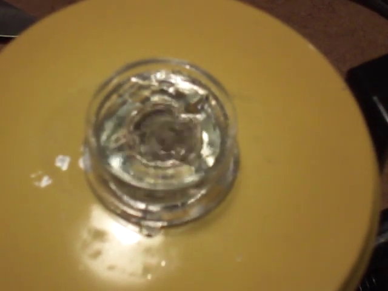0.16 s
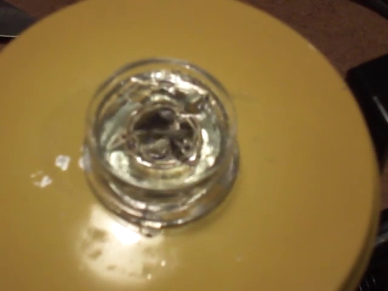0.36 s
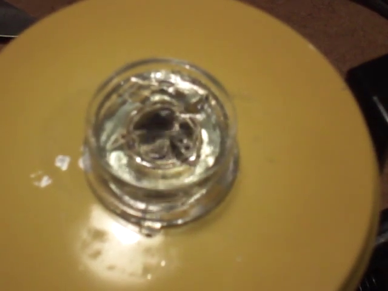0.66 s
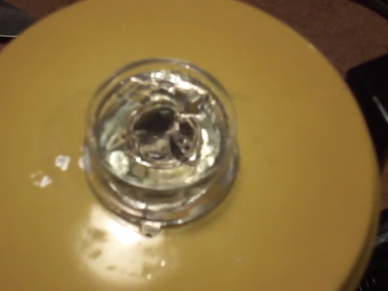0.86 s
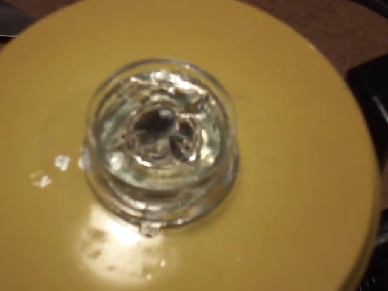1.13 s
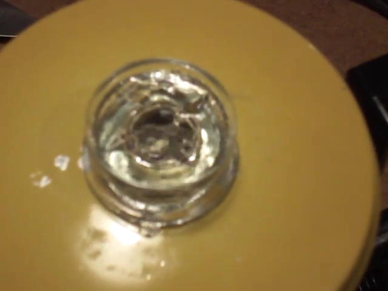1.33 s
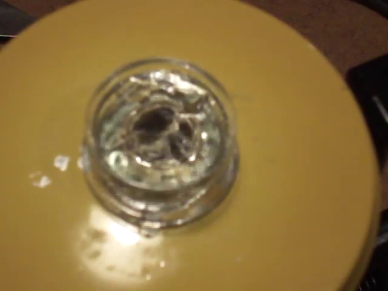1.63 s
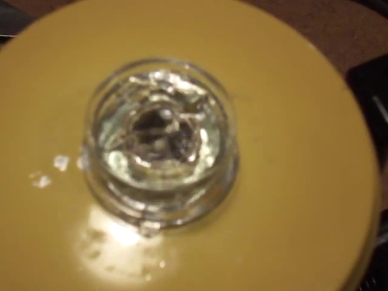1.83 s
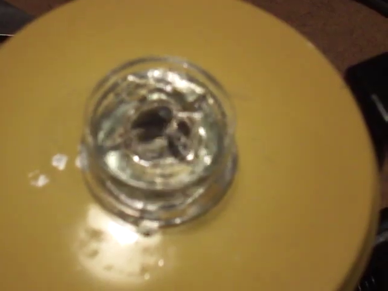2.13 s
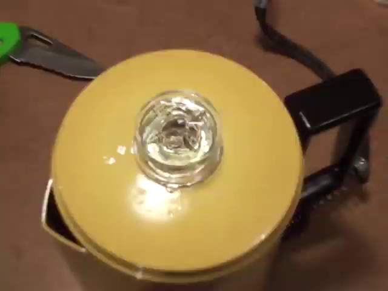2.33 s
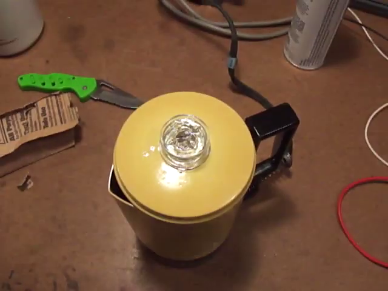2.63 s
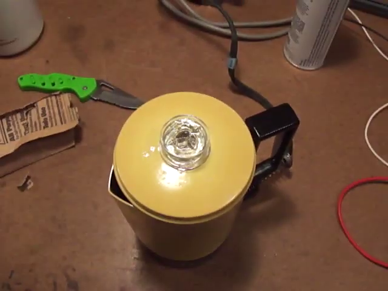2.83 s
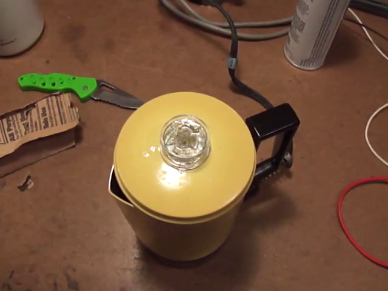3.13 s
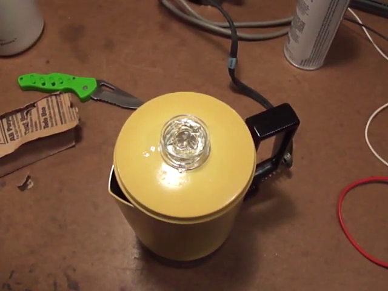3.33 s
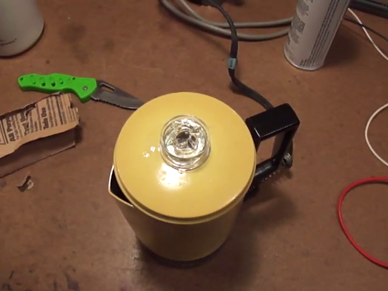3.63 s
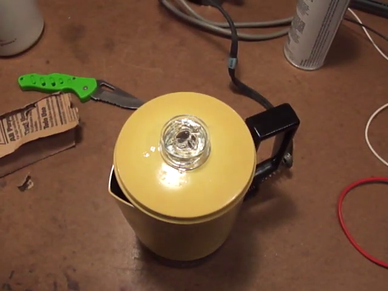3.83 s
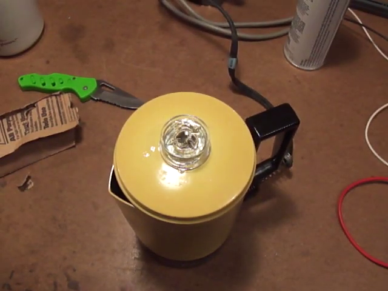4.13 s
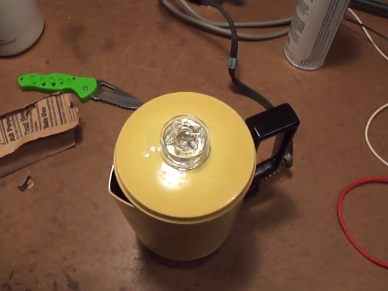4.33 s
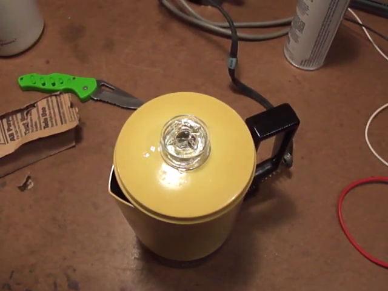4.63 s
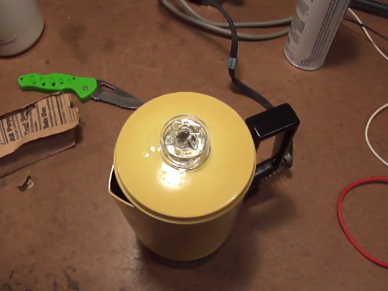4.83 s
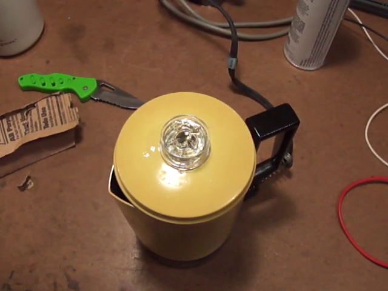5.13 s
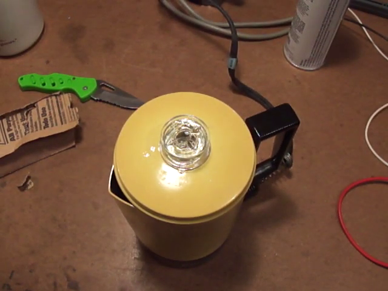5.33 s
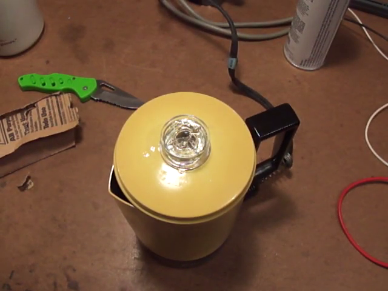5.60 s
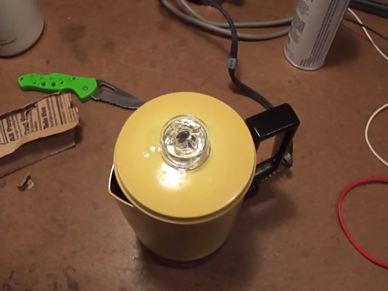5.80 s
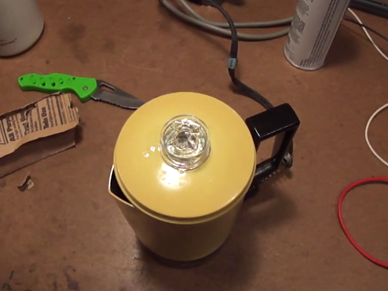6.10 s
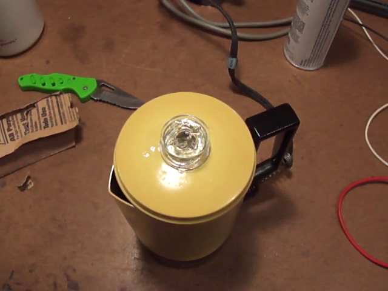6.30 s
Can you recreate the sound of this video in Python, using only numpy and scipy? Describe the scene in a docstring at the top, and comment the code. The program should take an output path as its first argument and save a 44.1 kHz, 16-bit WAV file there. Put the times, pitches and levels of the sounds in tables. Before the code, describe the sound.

Close by, a metal coffee percolator simmers with a steady, fine crackling hiss. About once a second, water spurts up against the knob in clusters of hollow, wet pops, then gurgles and sizzles back. Around two seconds in, the camera clicks, its zoom motor rasps and whines briefly, and its focus hisses. Later spurts are denser. Small, fairly dry indoor room, mono.

```python
"""An electric percolator brews beside a camera, over a steady crackling simmer of collapsing steam bubbles.
About once a second water spurts up the stem: damped bubble tones pop through the resonances of the pot,
with sharp noise splashes; filtered grains then gurgle and sizzle as the water falls back.
From about 2 s the camera joins in: its focus drive hisses, noise bursts click, the zoom drive rasps and
whines for a fifth of a second, and the focus drive hisses again; a few more clicks follow."""
import sys
import numpy as np
from scipy import signal
from scipy.fft import rfft, irfft
from scipy.io import wavfile

SR = 44100
rng = np.random.default_rng(int(sys.argv[2]) if len(sys.argv) > 2 else 0)


def transcribe(u):
    """Save the signal u as a 16-bit wav file named by the first command-line argument.

    u: samples, shape (n,) or (channels, n), limited to [-1, 1]; the rate is SR.
    q: integer samples, one column per channel.
    """
    v = np.clip(np.atleast_2d(u).T, -1, 1)
    q = np.round(v * 32767).astype(np.int16)
    wavfile.write(sys.argv[1], SR, q)


N = 284886
TIME = np.arange(N) / SR
FREQS = np.fft.rfftfreq(N, 1 / SR)

# slugs of water rising up the stem: (time [s], sag of the simmer [dB], negative for a swell,
# fall-back time [s], gurgle level [dB], sizzle level [dB])
SLUGS = [(.235, 0.9, .2, -65, -51), (1.15, 0, 0.22, -78, -67), (1.86, -0.2, 0.13, -73, -62),
         (3.27, 1.5, .22, -60, -53.5), (4.27, 0.8, 0.24, -64, -52), (5.2, 1, 0.29, -69, -52),
         (6.1, 0.7, .18, -54.5, -74)]
# resonances of the air above the water: (frequency [Hz], width [Hz], gain [dB])
AIR_MODES = [(907, 86, -6.5), (1012, 23, 4.5)]
# resonances of the metal wall: (frequency [Hz], width [Hz], lift before scaling [dB])
WALL_MODES = [(2812, 125, 7), (4080, 380, 3), (5500, 455, 9.5), (6380, 420, 8.5), (8710, 320, 11),
              (9300, 510, 4.5), (11790, 190, 6.5), (14200, 230, 4), (15700, 190, 7)]


def spurts(cycles=1.573, froth_s=0.008, froth_db=-14, frothiness=0.23, froth_fade_db_per_s=250,
           splash_decay_s=0.0008, splash_db=-3, count=6):
    """Bubble resonance: each main pop is a damped tone in a froth of lesser bubbles, with a sharp splash."""
    # pops of water against the knob, lid and pot:
    # (time [s], relative level [dB], pitch [Hz], relative level of the splash [dB])
    main_pops = [(.084, -39.5, 1960, -39.5), (0.142, -36.5, 1600, -52), (.2329, -20.5, 1635, -38),
                 (0.245, -32, 1850, -50), (0.3157, -30, 1520, -52), (0.3971, -39, 1750, -55),
                 (.4030, -32, 1780, -50), (1.099, -32.5, 1640, -55), (1.148, -33, 1640, -50),
                 (1.2048, -38.5, 1820, -34.5), (1.811, -52.5, 1090, -39), (1.847, -30, 1680, -43),
                 (1.94, -39.5, 1700, -49), (1.9974, -36, 1770, -47), (2.0065, -34.5, 1640, -31),
                 (2.013, -43, 1490, -36), (2.532, -27.5, 1880, -55), (2.5407, -31.5, 1720, -22.5),
                 (2.6304, -34, 1910, -54), (2.649, -31.5, 1770, -29.5), (3.208, -31.5, 1640, -42),
                 (3.214, -27.5, 1800, -48), (3.2343, -25, 1800, -27), (3.2602, -26, 1720, -50),
                 (3.2626, -23.5, 1740, -30.5), (3.2791, -23, 1910, -39), (3.2926, -28, 1500, -25.5),
                 (3.298, -29, 1550, -29), (3.332, -49, 1040, -56), (4.2428, -31.5, 1850, -46),
                 (4.251, -25, 1750, -36.5), (4.273, -22, 1910, -34), (4.3083, -26.5, 1620, -45),
                 (4.3904, -36.5, 1760, -57), (4.3984, -34, 1800, -44), (5.161, -16.5, 1840, -26),
                 (5.183, -28.5, 1470, -52), (5.193, -25, 1800, -38), (5.2269, -22, 1720, -25.5),
                 (5.267, -31, 1840, -44), (5.28, -36, 1500, -48), (5.322, -30, 1780, -40),
                 (5.444, -34, 1750, -52), (6.0773, -28, 1690, -43), (6.0866, -24.5, 1900, -31),
                 (6.0955, -22, 1760, -45), (6.1055, -30, 1410, -55), (6.1285, -25, 1780, -36),
                 (6.152, -40, 1810, -41), (6.265, -45, 1610, -50), (6.281, -57, 920, -58)]
    # colour that the pot gives to the pops: (frequency [Hz], gain [dB])
    pot_colour = [(100, -10), (400, -5.5), (620, 3), (850, 13.5), (1120, 1), (1450, 0.5), (1850, 2.5),
                  (2300, 6), (3050, 13), (3900, 29.5), (5000, 6), (15000, -32)]
    # brief ringing of the glass knob under the splash: (frequency [Hz], gain [dB])
    knob_colour = [(300, -27), (3300, 9), (6500, 2.5), (8300, 10), (9300, 13.5), (10400, 4.5), (16000, -7)]
    lead = 0.003  # silence [s] ahead of each pop
    t = np.arange(SR // 20) / SR
    pops, splashes = np.zeros(N), np.zeros(N)
    hardest_db = max(row[1] for row in main_pops)
    for s, db, hz, sharp_db in [*main_pops, *stray_pops()]:
        swell = cycles / hz  # low bubbles swell and fade more slowly
        pop = bubble(t - lead, hz, swell)
        lesser = gain_of(froth_db + frothiness * (hardest_db - db))  # gentle pops carry relatively more froth
        delays = froth_s * rng.exponential(1, count)
        pitches = hz * np.exp(0.19 * rng.uniform(-0.8, 1, count))
        for delay, pitch in zip(delays, pitches):
            level = lesser * gain_of(-froth_fade_db_per_s * delay)
            pop = pop + level * bubble(t - lead - swell - delay, pitch, cycles / pitch)
        add(pops, s - lead, gain_of(db - 5.5) * pop)
        onset = np.minimum(2 * t / splash_decay_s, 1)
        splash = burst(t, splash_decay_s) * onset
        add(splashes, s + swell / 2, gain_of(sharp_db + splash_db) * splash)
    pops = colour(pops, read(pot_colour, FREQS))
    pops = pops + sum(gain_of(db) * resonate(pops, hz, width) for hz, width, db in AIR_MODES)
    return pops + colour(splashes, read(knob_colour, FREQS))


def bubble(t, hz, swell, ring_s=0.0019, ring_db=-20):
    """Damped oscillation: a few cycles swell and fade, with a brief exponential ring."""
    t = np.maximum(t, 0)
    pulse = (t / swell * np.exp(1 - t / swell)) ** 2
    ring = gain_of(ring_db) * np.minimum(t / swell, 1) * np.exp(-t / ring_s)
    return (pulse + ring) * np.sin(2 * np.pi * (hz * t + rng.random()))


def stray_pops(count=7):
    """Random bubble bursts: faint pops scattered around each spurt, in rows like those of the main pops."""
    level_db, spread_db = -48.5, 2.5
    before_s, after_s, low_hz, high_hz = 0.06, 0.24, 1500, 2120
    rows = []
    for s, *_ in SLUGS:
        for when, size, pitch in rng.random((count, 3)):
            start = s - before_s + when * (before_s + after_s)
            db = level_db + spread_db * (2 * size - 1)
            hz = low_hz + pitch * (high_hz - low_hz)
            rows.append((start, db, hz, db - 10))  # the splash is weak
    return rows


def slosh(pops, settle_s=0.072, stirred_db=-20, per_s=160, spread_db=3.0):
    """Cavity resonance: drops stirred up by the pops, and water falling back, gurgle in the air above."""
    # colour of the drops: (frequency [Hz], gain [dB])
    drop_colour = [(200, -45.5), (550, -20.0), (900, 6.5), (1700, -1), (2600, -8.5), (6000, -23.5)]
    gurgle_s = 0.023
    keep = np.exp(-1 / (settle_s * SR))
    stirred = np.sqrt(signal.lfilter([1 - keep], [1, -keep], pops ** 2))  # running rms of the pops
    drops = colour(grains(per_s, spread_db), read(drop_colour, FREQS))
    gurgle = drops + sum(resonate(drops, hz, width) for hz, width, _ in AIR_MODES)
    returning = sum(gain_of(db) * hump(s + fall, gurgle_s) for s, _, fall, db, _ in SLUGS)
    return (gain_of(stirred_db) * stirred + returning) * evened(gurgle)


def sizzle(wall_share=0.98):
    """Rapid boiling: water that falls back on the hot plate fizzes in fine, bright bubbles."""
    # colour of the fizz: (frequency [Hz], gain [dB])
    fizz_colour = [(500, -22), (3000, -17), (6000, 6), (10500, 5.5), (15000, 4.5)]
    lag_s, half_s = 0.035, 0.096  # delay after the fall-back, half-width of the swell
    level = sum(gain_of(db) * hump(s + fall + lag_s, half_s) for s, _, fall, _, db in SLUGS)
    fizz = colour(grains(3000, 2.4), read(fizz_colour, FREQS) + wall_share * wall_db())
    return level * evened(fizz)


def simmer(per_s=2500, spread_db=2.0, smooth_db=0, crackle_db=-8, ticks_per_s=70, tick_spread_db=4.5):
    """Bubble collapse: tiny steam bubbles hiss; larger ones tick, each ringing one resonance of the wall."""
    # broad colour of the simmer: (frequency [Hz], relative spectral level [dB])
    simmer_colour = [(30, -20), (130, -21), (300, -18), (500, -10.5), (800, -4), (1400, 0.5), (2100, 3.5),
                     (3400, 1), (4200, 0.5), (7300, -3), (10500, -3.5), (13800, -5), (16000, -4.5)]
    bubbles = grains(per_s, spread_db) + gain_of(smooth_db) * rng.standard_normal(N)
    spectrum = rfft(colour(bubbles, read(simmer_colour, FREQS) + 0.67 * wall_db()))
    # overlapping bands, for bubbles of each size, come and go on their own
    centres = np.linspace(0, 16000, 14)
    hiss = np.zeros(N)
    for share in np.eye(len(centres)):
        band = irfft(spectrum * np.interp(FREQS, centres, share), N)
        hiss += band * gain_of(1.4 * drift(16))
    ticks = np.zeros(N)
    for hz, width, db in WALL_MODES:
        ticks += gain_of(db) * resonate(grains(ticks_per_s, tick_spread_db), hz, width)
    ticks = signal.sosfilt(signal.butter(2, 1800, "high", fs=SR, output="sos"), ticks)
    sound = band_evened(hiss, 2000, 7000) + gain_of(crackle_db) * band_evened(ticks, 2000, 7000)
    return sound * gain_of(boil_db())


def boil_db():
    """Heat balance: a spurt draws heat off the plate, so the simmer sags, then boils up (or the reverse)."""
    base_db = -56
    sag_lag_s, sag_s = 0.056, 0.15  # delay and half-width
    surge, surge_lag_s, surge_s = 0.76, 0.55, 0.16  # share of the sag, delay and half-width
    change = 0
    for s, sag_db, *_ in SLUGS:
        change = change + sag_db * (surge * hump(s + surge_lag_s, surge_s) - hump(s + sag_lag_s, sag_s))
    return base_db + change


def wall_db():
    """Modal response: the lift that the wall's resonances give at each frequency, before scaling."""
    return sum(db / (1 + (2 * (FREQS - hz) / width) ** 2) for hz, width, db in WALL_MODES)


def clicks(level_db=-2, ring_db=-37, part_db=1, part_width_hz=2200):
    """Impact excitation: dry snaps, each coloured by the struck part, with a thin modal ring of the case."""
    # clicks of the zoom lever and lens:
    # (time [s], relative level [dB], decay [s], pitch of the struck part [Hz])
    click_rows = [(2.2914, -14, 0.00064, 8300), (2.3284, -26, 0.0015, 3750), (2.334, -27, .0015, 2600),
                  (2.4808, -31.5, 0.0043, 3300), (2.5446, -13, 0.00083, 7450), (2.5507, -33, 0.0036, 10500),
                  (4.1137, -38.5, 0.0094, 10600), (4.12, -30, 0.00093, 5000), (5.418, -39, 0.012, 5550)]
    # colour of the snaps: (frequency [Hz], gain [dB])
    snap_colour = [(200, -37), (700, -9.5), (1500, 0.5), (2500, -2.5), (4500, 4), (8000, 2), (12000, 0),
                   (14500, 2), (16000, -9)]
    # modes of the camera case: (frequency [Hz], relative level [dB], time to fall by 60 dB [s])
    case_modes = [(6650, 6, 0.088), (10300, 8, 0.04)]
    t, snaps, rings = np.arange(SR // 8) / SR, np.zeros(N), np.zeros(N)
    ring = np.zeros(len(t))
    for hz, db, t60 in case_modes:
        ring += gain_of(db) * np.exp(-np.log(1000) * t / t60) * np.sin(2 * np.pi * hz * t)
    for s, db, decay, hz in click_rows:
        snap = gain_of(db + level_db) * burst(t, decay)
        struck_part = gain_of(part_db) * resonate(snap, hz, part_width_hz)
        add(snaps, s, 0.93 * snap + struck_part)
        add(rings, s, gain_of(db + ring_db) * ring)
    return colour(snaps, read(snap_colour, FREQS)) + rings


def zoom(gear_db=-0.5, wobble=0.02, jitter=0.012):
    """Gear-mesh harmonics: the zoom drive rasps while its gear whines at multiples of a wavering pitch."""
    # envelope of the zoom drive, applied to rasp and gear together: (time [s], level [dB])
    drive_level = [(2.325, -52), (2.335, -45.5), (2.40, -43.5), (2.47, -42.5), (2.521, -42), (2.528, -62)]
    # colour of the rasp: (frequency [Hz], relative spectral level [dB])
    rasp_colour = [(100, -43), (450, -28), (800, -10), (1800, 3), (2400, 0.5), (3000, 3.5), (4700, -0.5),
                   (6200, 1), (8500, -0.5), (10000, -2.5), (15500, -5)]
    # gear harmonics: (multiple of the base pitch, relative level [dB])
    orders = [(1, -20), (3, -9), (6, -9), (9, -4), (10, -4), (15, -2), (16, -8), (18, -4), (21, -5)]
    s, db = np.transpose(drive_level)
    rasp = evened(colour(grains(6000, 1.6), read(rasp_colour, FREQS)))
    unsteady = 1 + wobble * np.sin(2 * np.pi * 66 * TIME) + jitter * drift(253)
    base_hz = np.interp(TIME, [2.34, 2.42], [635, 662]) * unsteady
    phase = np.cumsum(base_hz) / SR  # in cycles
    gear = np.zeros(N)
    for k, order_db in orders:
        flutter = 1 + 0.7 * drift(70)  # the teeth mesh unevenly
        gear += gain_of(order_db) * flutter * np.sin(2 * np.pi * k * phase)
    level = gain_of(np.interp(TIME, s, db)) * (TIME > s[0]) * (TIME < s[-1])
    return level * (rasp + gain_of(gear_db) * evened(gear))


def focus(ramp_s=0.016):
    """Sliding friction: the focus drive moves with a thin, bright hiss of filtered noise."""
    # short moves of the focus drive: (start [s], end [s], level [dB])
    moves = [(1.889, 1.941, -45.5), (2.139, 2.188, -48), (2.685, 2.796, -45.5), (2.787, 2.879, -46)]
    # colour of the hiss: (frequency [Hz], gain [dB])
    hiss_colour = [(400, -33), (2500, -8.5), (6000, -0.5), (11000, -4), (15000, -1.5)]
    level = np.zeros(N)
    for start, end, db in moves:
        level += gain_of(db) * np.clip(np.minimum(TIME - start, end - TIME) / ramp_s, 0, 1)
    return level * evened(colour(rng.standard_normal(N), read(hiss_colour, FREQS)))


def thumps(decay_s=0.00029):
    """Structure-borne shock: small, dull one-sided pulses that die away exponentially."""
    # knocks carried through the camera body: (time [s], peak level [dB])
    knocks = [(2.2924, -48), (2.5446, -42), (4.127, -43)]
    t, out = np.arange(SR // 20) / SR, np.zeros(N)
    for s, db in knocks:
        add(out, s, gain_of(db) * np.exp(-t / decay_s))
    return out


def room(x, t60=0.18, wet_db=-17):
    """Reverberation: a short, faint, exponentially decaying tail from the bench and walls."""
    t = np.arange(SR // 3) / SR
    tail = burst(t, t60 / np.log(1000)) * (t > 0.003)
    return x + gain_of(wet_db) * signal.fftconvolve(x, tail / np.linalg.norm(tail))[:N]


def resonate(x, hz, width):
    """Resonance: a one-pole complex filter, with a gain of about 1 at its peak."""
    r = np.exp(-np.pi * width / SR)
    return 2 * signal.lfilter([1 - r], [1, -r * np.exp(2j * np.pi * hz / SR)], x).real


def grains(per_s, spread_db):
    """Shot noise: random impulses of rms 1 overall, most small and a few large."""
    size = gain_of(spread_db * np.minimum(rng.exponential(1, N), 5))
    return evened(size * rng.choice([-1, 1], N) * (rng.random(N) < per_s / SR))


def burst(t, decay):
    """Decaying noise: a snap whose energy depends only on its decay time."""
    shape = np.exp(-t / decay)
    snap = shape * rng.standard_normal(len(t))
    return snap * np.linalg.norm(shape) / np.linalg.norm(snap)


def drift(rate_hz):
    """Low-passed noise: a slow random signal of rms 1."""
    spectrum = rfft(rng.standard_normal(N)) * np.exp(-(FREQS / rate_hz) ** 2)
    return evened(irfft(spectrum * (FREQS > 0), N))


def hump(s, half_s):
    """Gaussian envelope: a smooth swell of height 1 around time s."""
    return np.exp(-((TIME - s) / half_s) ** 2)


def colour(x, db):
    """Minimum-phase filtering: a causal filter with the gain db at each of FREQS."""
    log_gain = np.log(gain_of(np.concatenate([db, db[-2:0:-1]])))
    response = np.exp(np.conj(signal.hilbert(log_gain)))[:len(db)]
    return irfft(rfft(x) * response, N)


def read(points, hz):
    """Spectral envelope: points joined by straight lines on a log-frequency axis."""
    f, value = np.transpose(points)
    return np.interp(np.log(hz + 1), np.log(f + 1), value)


def gain_of(db):
    """Decibel law: level to amplitude."""
    return 10 ** (np.asarray(db) / 20)


def evened(x):
    """Power normalisation: scales to rms 1."""
    return x / np.sqrt(np.mean(x ** 2) + 1e-20)


def band_evened(x, lo_hz, hi_hz):
    """Band-power normalisation: scales so that one band has rms 1."""
    return x / np.std(irfft(rfft(x) * ((FREQS > lo_hz) & (FREQS < hi_hz)), N))


def add(mix, s, sound):
    """Superposition: mixes a sound in at time s."""
    part = mix[max(round(s * SR), 0):][:len(sound)]
    part += sound[:len(part)]


def scene():
    """Superposition: pot and camera sum to one signal, the same in both channels."""
    pops = spurts()
    pot = room(pops + slosh(pops)) + simmer() + sizzle()
    camera = zoom() + focus() + clicks() + thumps()
    return np.array([pot + camera, pot + camera])


def record(dry):
    """Band limiting: a linear-phase low-pass filter removes the extreme treble."""
    edge_hz = 15800
    low_pass = signal.firwin(511, edge_hz, window=("kaiser", 9), fs=SR)
    return signal.oaconvolve(dry, low_pass[None], "same")


dry = scene()
out = record(dry)
transcribe(out)
```